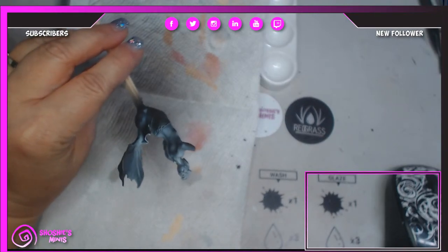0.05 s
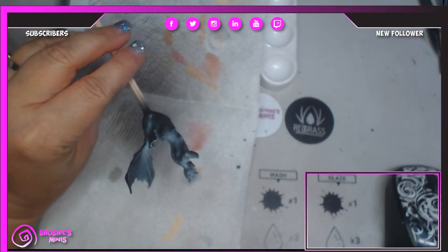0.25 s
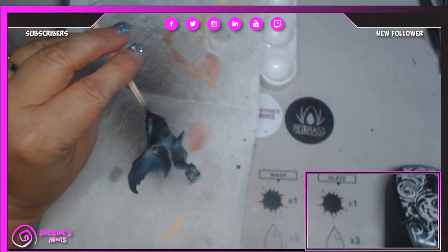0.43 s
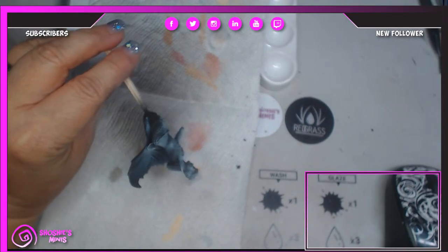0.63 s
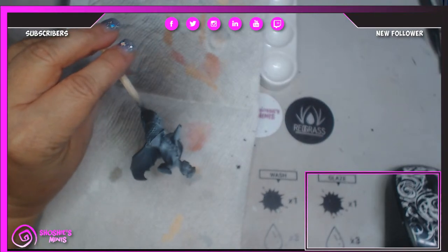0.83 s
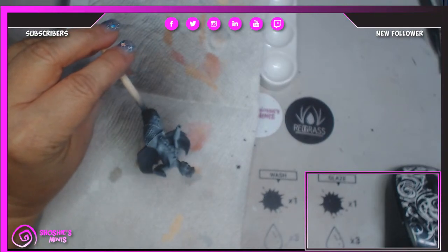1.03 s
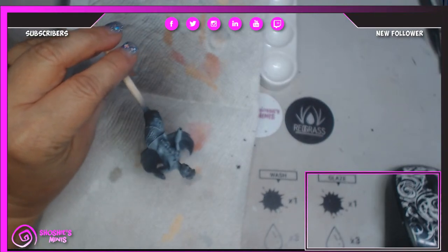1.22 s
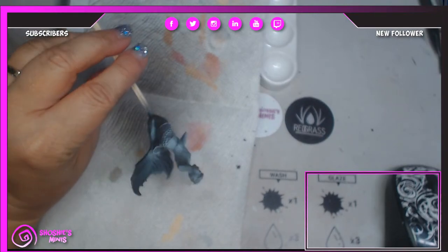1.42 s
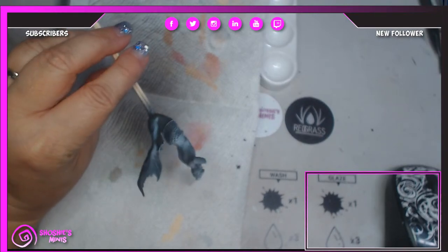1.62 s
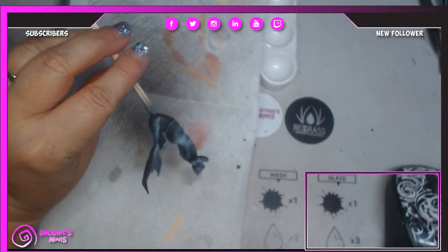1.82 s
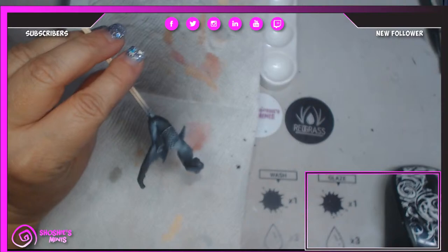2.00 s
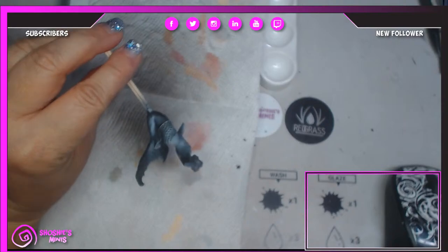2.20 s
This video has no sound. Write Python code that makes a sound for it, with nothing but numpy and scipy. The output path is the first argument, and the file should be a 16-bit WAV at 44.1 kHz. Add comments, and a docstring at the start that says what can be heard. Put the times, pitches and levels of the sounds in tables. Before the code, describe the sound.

Airbrush spraying with a steady hiss, then thinning out, with soft low bumps on a desk.

```python
"""An airbrush close to a desk microphone in a small room, mono and narrow-band.
It opens on the full jet, a hiss of turbulent air, while hands shift and bump on the desk, which booms
low through the microphone stand. Faint handling taps follow. At 1.1 s the trigger eases, leaving a
thin, slightly whistling hiss. From 1.6 s the hands bump and rub again, and just after 2 s the air
dies away. Almost nothing lies between the low bumps and the high hiss."""
import sys
import numpy as np
from scipy import signal
from scipy.fft import rfft, irfft, next_fast_len
from scipy.io import wavfile
from scipy.ndimage import uniform_filter1d, map_coordinates

SR = 44100
rng = np.random.default_rng(int(sys.argv[2]) if len(sys.argv) > 2 else 0)


def materialize(psi):
    """Save the field psi as 16-bit PCM at rate SR to the path in sys.argv[1].

    A 1-D psi becomes a single channel; in a 2-D psi each row is a channel.
    """
    bounded = np.clip(np.atleast_2d(psi).T, -1, 1)
    quanta = np.round(bounded * 32767).astype(np.int16)
    wavfile.write(sys.argv[1], SR, quanta)


N = 99269
T = np.arange(N) / SR
EASE_S, STOP_S = 1.09, 2.067  # the trigger is let back; the air dies away

# strength of the full jet (time [s], hiss level [dB], level of its lower edge [dB])
JET_LEVELS = [(0.02, -45.5, -64), (0.034, -50, -66), (0.186, -48, -63.5), (0.294, -49, -65),
              (0.536, -47.5, -61.5), (0.558, -49, -65.5), (0.768, -46.5, -59.5), (0.796, -47, -62),
              (0.87, -46.5, -58), (0.882, -46, -61), (1.058, -47, -62), (1.07, -46, -58)]
# colour of the full jet (frequency [Hz], level [dB])
JET_SPECTRUM = [(1900, -54.5), (2130, -31.5), (2260, -19), (2550, -11), (3500, -11), (4300, -6),
                (4900, -6.5), (5300, -2), (6200, 0), (6850, -2), (7450, -1), (7650, -18.5), (7950, -53)]
# resonances of the airflow (frequency [Hz], width [Hz], lift in the jet [dB],
# then in the weak flow: early level [dB], middle level [dB], late level [dB])
AIR_RESONANCES = [(2912, 190, 3, -91.5, -88.5, -86), (3460, 200, 0, -97, -91.5, -86.5),
                  (4029, 190, 5.5, -79.5, -84, -77.5), (4490, 140, 4, -77, -91, -81.5),
                  (5446, 260, 4, -71, -78.5, -88), (5800, 100, 2, -77, -84, -76.5),
                  (6220, 170, 2.5, -74.5, -82, -86), (6540, 250, 7.5, -65.5, -72, -76.5),
                  (7160, 85, 1.5, -72.5, -79.5, -76), (7252, 190, 1.5, -70, -74.5, -72)]
# soft knocks on the desk (time [s], level [dB], contact time [ms])
DESK_KNOCKS = [(.001, -51.5, 2.1), (0.033, -52.5, 4.8), (0.062, -56, 5), (0.111, -49.5, 5), (0.154, -53, 5),
               (0.196, -50, 3.6), (.274, -70.5, 4), (0.323, -67, 2.5), (1.59, -52, 4), (1.612, -45, 2.06),
               (1.627, -44, 2.26), (1.657, -48.5, 4.1), (1.742, -44.5, 3.5), (1.756, -47, 1.8),
               (1.773, -45.5, 2.5), (1.794, -33, 1.8), (1.822, -41, 0.67), (1.847, -43, 3),
               (1.878, -40, 2.2), (1.901, -48, 1.7), (1.949, -43.5, 2.25), (1.98, -43, 4.7),
               (2.008, -42, 3.4), (2.03, -50, 2.5), (2.057, -45, 2.22), (2.084, -54.5, 3)]
# modes of the desk (frequency [Hz], level [dB], t60 [s])
DESK_MODES = [(70.5, 0, 0.066), (97.3, 2.5, 0.067), (136.6, -8.5, 0.09), (189, -6.5, .05),
              (260, -9.5, 0.034), (386, -22, .05)]
# hands rubbing on the desk (time [s], level [dB])
RUB_LEVELS = [(0, -63), (.2, -78.5), (.25, -77.5), (.35, -78), (.42, -94), (.52, -120), (1.575, -130),
              (1.595, -64), (1.69, -62), (1.81, -50.5), (1.92, -56), (2.07, -56), (2.125, -76.5),
              (2.23, -104)]
# colour of the rubbing (frequency [Hz], level [dB])
RUB_SPECTRUM = [(20, -43), (40, -16.5), (65, 1.5), (100, 1), (150, -10), (240, -16.5), (330, -31.5),
                (420, -43.5), (520, -73)]
# faint handling taps (time [s], frequency [Hz], level [dB])
HANDLING_TAPS = [(.005, 590, -76.5), (.205, 620, -92), (.51, 2040, -77.5), (.52, 1040, -90.5),
                 (.535, 633, -93), (.60, 627, -87), (.655, 1122, -93), (.67, 610, -84.5), (0.681, 786, -80),
                 (.745, 620, -85), (.75, 770, -81), (.76, 1180, -94), (1.452, 1092, -86),
                 (1.95, 740, -95.5), (2.17, 1172, -90)]
# thin hiss of the weak flow (time [s], level [dB])
WEAK_FLOW_LEVELS = [(1.09, -66), (1.25, -71), (1.55, -78.5), (1.8, -77), (2.075, -75.5)]
# colour of that hiss (frequency [Hz], level [dB])
WEAK_FLOW_SPECTRUM = [(2000, -43), (2500, -18), (2800, -13.5), (4300, -9), (4850, -7.5), (5500, -4),
                      (6100, -0.5), (6850, 0.5), (7400, 0), (7750, -41.5)]
# moments of the weak flow: just eased, early, middle, late (time [s])
WEAK_FLOW_STAGES = [1.099, 1.28, 1.57, 1.921]
# brief whistles in the airflow (time [s], length [s], frequency [Hz], level [dB])
AIR_WHISTLES = [(.335, 0.061, 2700, -65.5), (1.387, .06, 6530, -64), (1.666, 0.023, 6640, -60.5),
                (1.729, 0.063, 7100, -65.5), (1.829, .025, 6550, -62.5), (1.917, 0.011, 7200, -54)]
# threshold of the noise suppressor (frequency [Hz], level [dB])
SUPPRESSOR_THRESHOLD = [(30, -108), (70, -110), (140, -96), (250, -87.5), (450, -97.5), (560, -140)]
# the room's level, and its decay (frequency [Hz], t60 [s])
ROOM_DB, ROOM_T60 = -15, [(2500, 0.29), (4500, .34), (7500, 0.21)]
# the self-noise's level, and its colour (frequency [Hz], level [dB])
FLOOR_DB, FLOOR_COLOUR = -99, [(20, -0.48), (2000, 0.95), (16000, -1.3)]


def amp(db):
    """Decibels to gain."""
    return 10 ** (np.asarray(db) / 20)


def unit(x):
    """Scale to rms 1."""
    return x / np.sqrt(np.mean(x ** 2) + 1e-30)


def along(points, hz):
    """Read (frequency [Hz], value) points along a log axis."""
    f, v = np.transpose(points)
    return np.interp(np.log(hz + 1), np.log(f + 1), v)


def curve(rows):
    """(time [s], value) points as one value per sample."""
    return np.interp(T, *np.transpose(rows))


def wobble(rate):
    """A smooth random curve, rate knots a second."""
    return map_coordinates(rng.standard_normal(1024), [T * rate], mode="wrap")


def bell(x, centre, width):
    """A bump of height 1, width taken at half height."""
    return .5 ** ((2 * (x - centre) / width) ** 2)


def filtered(x, response):
    """Filter x by a gain that depends on frequency."""
    m = next_fast_len(N + SR // 2)
    return irfft(rfft(x, m) * response(np.fft.rfftfreq(m, 1 / SR)), m)[:N]


def coloured(x, colour):
    """Filter x by (frequency [Hz], level [dB]) points."""
    return filtered(x, lambda hz: amp(along(colour, hz)))


def noise(colour):
    """Noise of rms 1 in the given colour."""
    return unit(coloured(rng.standard_normal(N), colour))


def turbulence(patchy_db=2.06):
    """Turbulent air: white noise in patches of random gain over time and frequency."""
    z = signal.stft(rng.standard_normal(N), SR, nperseg=1024)[2]
    patches = uniform_filter1d(rng.standard_normal(z.shape), size=6, axis=0)
    patches = uniform_filter1d(patches, size=5, axis=1)
    return signal.istft(z * amp(patchy_db * unit(patches)), nperseg=1024)[1][:N]


def jet(split_hz=3700, widen=1.2, cut_db_per_s=3503):
    """The full spray, close up: strong flow blurs the air resonances, until the trigger eases."""
    def lift_db(hz):
        return sum(db * bell(hz, centre, widen * width) for centre, width, db, *_ in AIR_RESONANCES)

    times, hiss_db, edge_db = np.transpose(JET_LEVELS)
    air = filtered(turbulence(), lambda hz: amp(along(JET_SPECTRUM, hz) + lift_db(hz)))
    low = filtered(air, lambda hz: hz < split_hz)
    hiss = amp(np.interp(T, times, hiss_db)) * unit(air - low)
    lower_edge = amp(np.interp(T, times, edge_db)) * unit(low)
    return (hiss + lower_edge) * amp(0.19 * wobble(35) - cut_db_per_s * np.maximum(T - EASE_S, 0))


def room(x):
    """The small room around the microphone: a short tail, each frequency dying at its own speed."""
    hz, t, z = signal.stft(rng.standard_normal(SR // 2), SR, nperseg=256)
    decay = amp(-60 * t / along(ROOM_T60, hz)[:, None])
    tail = signal.istft(z * decay, SR, nperseg=256)[1]
    return signal.fftconvolve(x, tail / np.linalg.norm(tail))[:N]


def knocks(stand_band_hz=(42.7, 450)):
    """Soft pushes ring the desk's modes, heard through the stand; a longer contact is duller."""
    out, t = np.zeros(N + SR), np.arange(SR // 3) / SR
    stand = signal.butter(3, stand_band_hz, "band", fs=SR, output="sos")
    for s, db, contact_ms in DESK_KNOCKS:
        ring = sum(amp(level + rng.normal(0, 4.5) - 60 * t / t60) * np.sin(2 * np.pi * hz * t)
                   for hz, level, t60 in DESK_MODES)
        push = bell(t * 1000, centre=2 * contact_ms + 2, width=contact_ms)
        thud = signal.sosfilt(stand, signal.fftconvolve(ring, push)[:len(t)])
        start = max(round(s * SR) - np.argmax(push), 0)
        out[start:start + len(t)] += amp(db) * thud / np.abs(thud).max()
    return coloured(out[:N], [(420, -1), (540, -33.5), (900, -90)])


def rub():
    """Hands shift on the desk with a low, uneven rumble."""
    return amp(curve(RUB_LEVELS) + 4.5 * wobble(30)) * noise(RUB_SPECTRUM)


def taps(attack_s=0.0022, t60=0.17, width_hz=110):
    """Things being handled give tiny dull taps, each a narrow band of noise dying away."""
    out = np.zeros(N)
    for s, centre, db in HANDLING_TAPS:
        t = np.maximum(T - s, 0)
        band = unit(filtered(rng.standard_normal(N), lambda hz: bell(hz, centre, width_hz)))
        out += amp(db - 60 * t / t60) * (1 - np.exp(-t / attack_s)) * band
    return out


def weak_flow(ease_lift_db=3, flutter_db=2.33, stop_db_per_s=484.5):
    """With the trigger eased, each air resonance sings as narrow noise over a thin hiss."""
    air = amp(curve(WEAK_FLOW_LEVELS)) * noise(WEAK_FLOW_SPECTRUM)
    for centre, width, _, early, middle, late in AIR_RESONANCES:
        band = unit(filtered(rng.standard_normal(N), lambda hz: bell(hz, centre, width) ** .5))
        level_db = np.interp(T, WEAK_FLOW_STAGES, [early + ease_lift_db, early, middle, late])
        air += amp(level_db + flutter_db * wobble(22)) * band
    return (T > EASE_S) * air * amp(wobble(44) - stop_db_per_s * np.maximum(T - STOP_S, 0))


def whistles(edge_s=0.0046, waver_hz=69.5):
    """A resonance of the airflow flares up for a moment into a wavering tone."""
    out = np.zeros(N)
    for s, length, hz, db in AIR_WHISTLES:
        drift_cycles = np.cumsum(waver_hz * wobble(350)) / SR
        tone = np.sin(2 * np.pi * (hz * T + drift_cycles))
        rise = (1 + np.tanh((T - s) / edge_s)) / 2
        fall = (1 - np.tanh((T - s - length) / (3 * edge_s))) / 2
        out += amp(db + 1.8 * wobble(110)) * rise * fall * tone
    return out


def scene():
    """One desk microphone feeds both channels; only the full jet is loud enough to stir the room."""
    spray = jet()
    air = spray + amp(ROOM_DB) * room(spray) + weak_flow() + whistles()
    air = coloured(air, [(1700, -55.5), (2150, -0.5), (7700, -0.5), (8100, -22)])
    mono = air + knocks() + rub() + taps()
    return np.array([mono, mono])


def suppressed(x):
    """Noise suppressor: low bands that fall under the threshold are turned down."""
    hz, _, z = signal.stft(x, SR, nperseg=1024, noverlap=768)
    power = np.abs(uniform_filter1d(np.abs(z) ** 2, size=3, axis=0))
    gain = power / (power + amp(along(SUPPRESSOR_THRESHOLD, hz))[:, None] ** 2)
    return signal.istft(z * gain, SR, nperseg=1024, noverlap=768)[1][:N]


def record(dry, hum_hz=60, hum_db=-115, top_hz=8700):
    """The microphone's chain: noise suppression, faint self-noise and mains hum, then a band limit."""
    hum = amp(hum_db) * unit(np.sin(2 * np.pi * hum_hz * T))
    floor = amp(FLOOR_DB) * noise(FLOOR_COLOUR) + hum
    return np.array([filtered(suppressed(ch) + floor, lambda hz: hz < top_hz) for ch in dry])


dry = scene()
out = record(dry)
materialize(out)
```